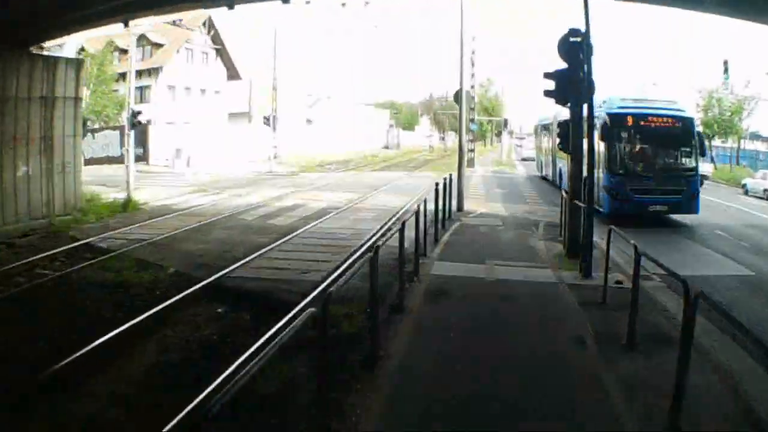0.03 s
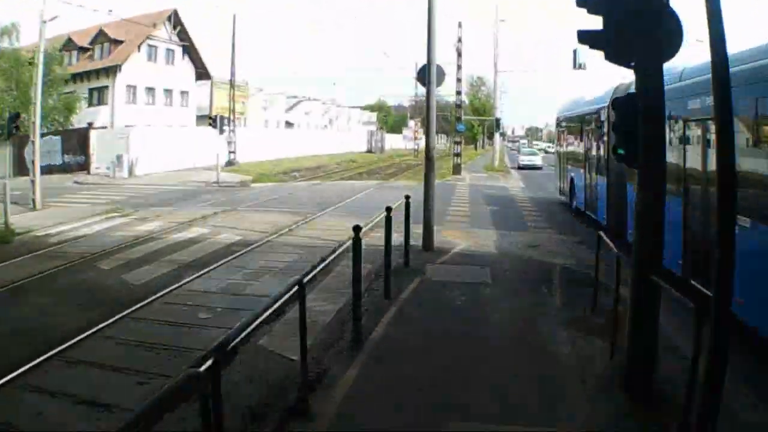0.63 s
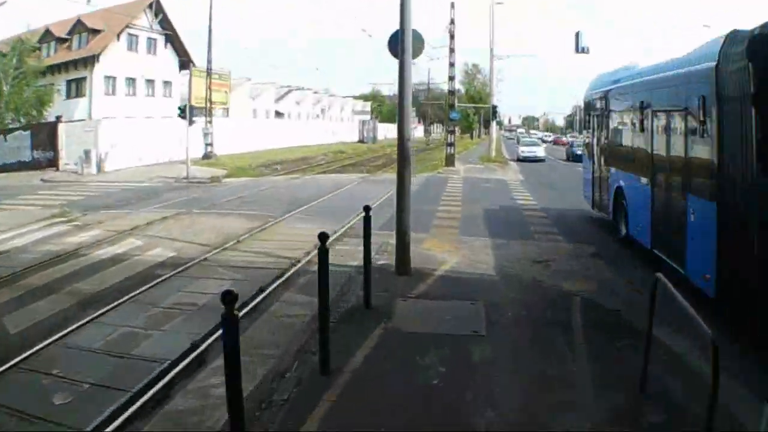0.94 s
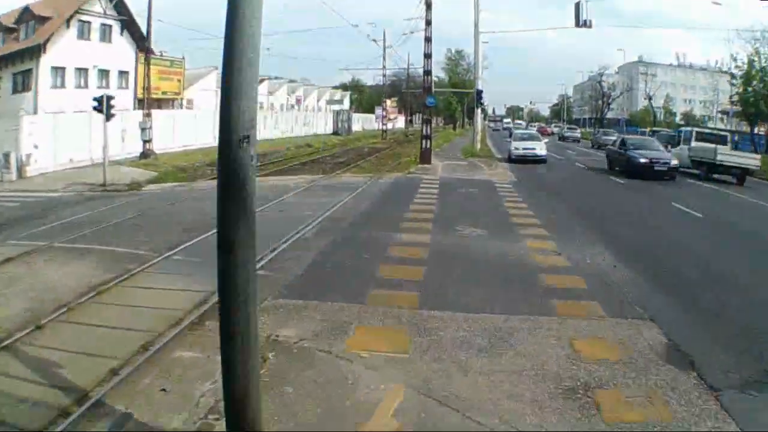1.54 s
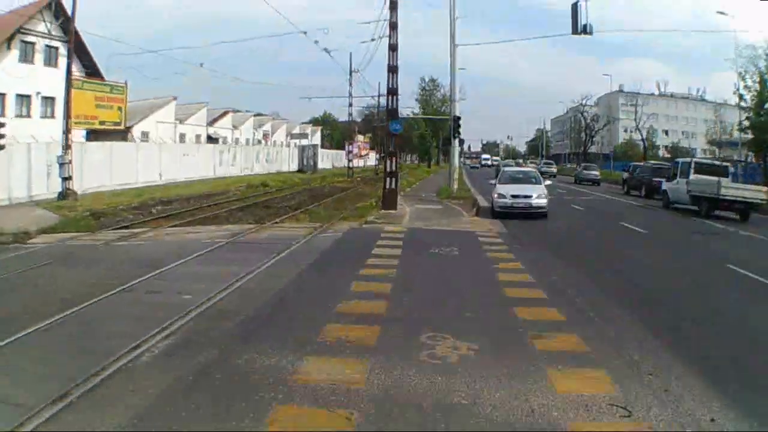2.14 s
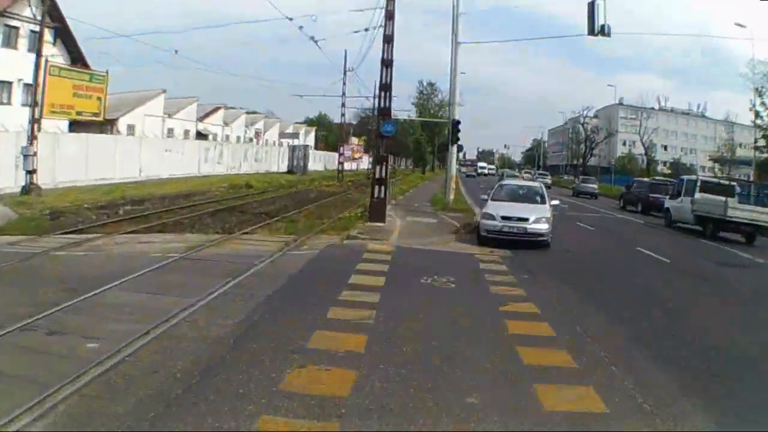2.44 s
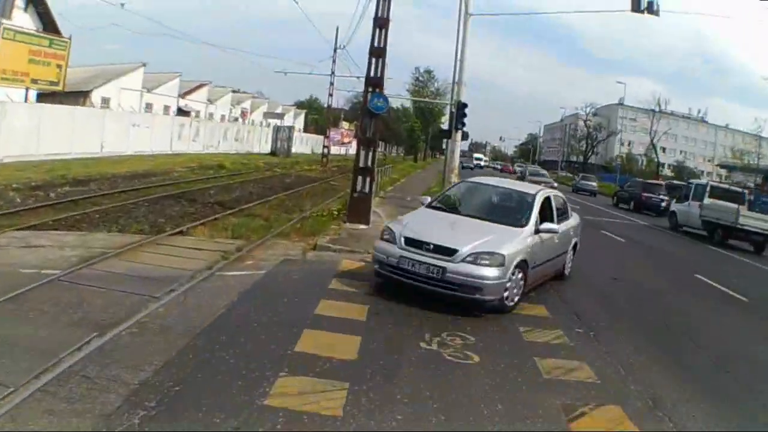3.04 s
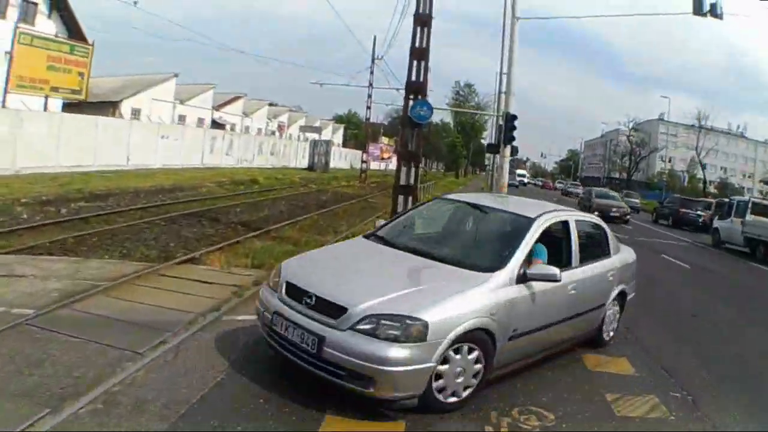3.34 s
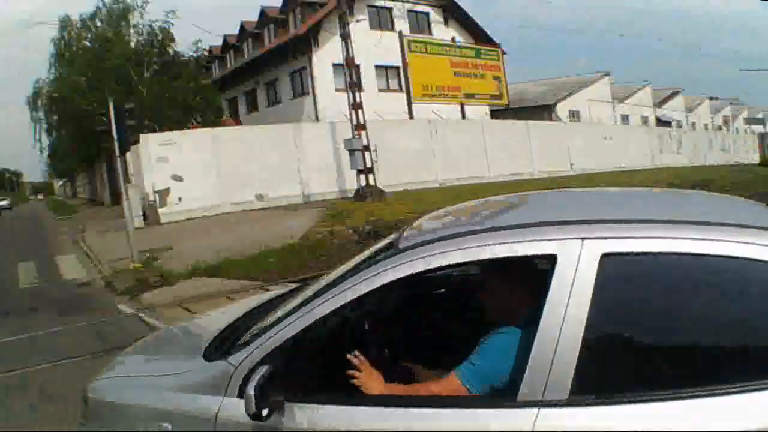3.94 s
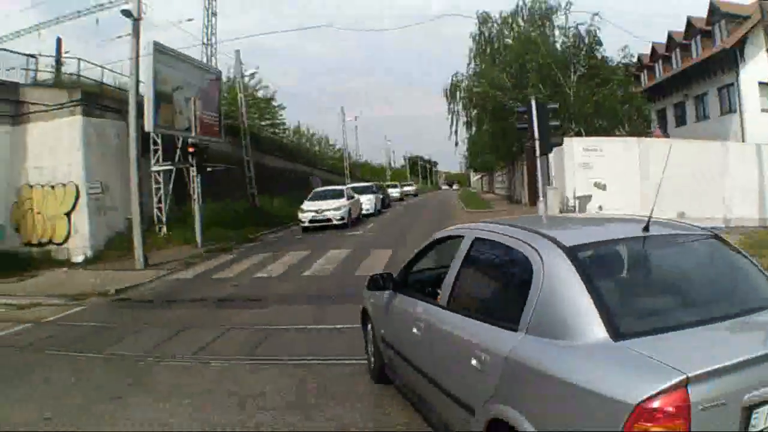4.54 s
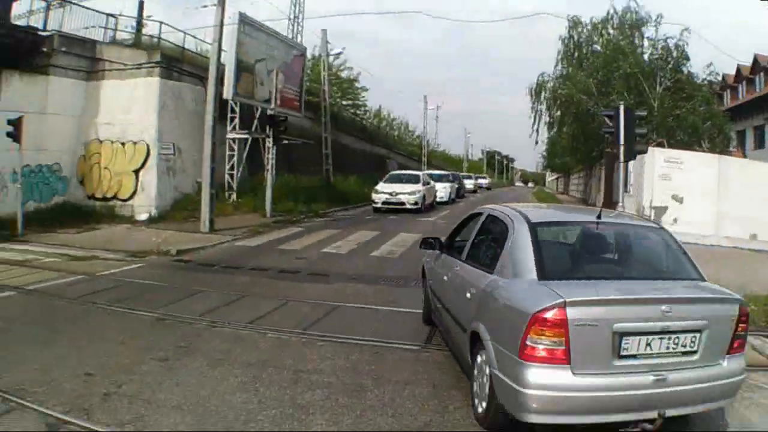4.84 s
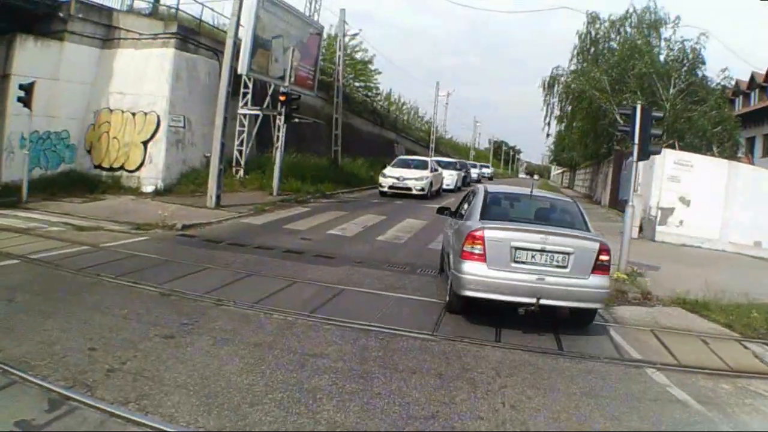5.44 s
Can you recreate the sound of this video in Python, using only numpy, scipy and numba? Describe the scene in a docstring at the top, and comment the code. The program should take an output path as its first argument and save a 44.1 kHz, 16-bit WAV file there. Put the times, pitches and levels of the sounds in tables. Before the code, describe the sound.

A bicycle air horn blasts one long, distorted note over street noise, with a brief brake squeak, before a car pulls away.

```python
"""An air horn on a bicycle blasts one long 800 Hz note, so close that the camera turns its gain down and
still overloads. The buzzing diaphragm beats against its own reflections and echoes off the house fronts.
Under it a brake block squeaks on the rim as a car cuts across the bike path. The car pulls away,
its exhaust booming with the rising revs, and the bicycle rattles and ticks faintly.
Tyre noise from the city street and a deep rumble from the overloaded microphone lie beneath it all."""
import sys
import numpy as np
from scipy import signal
from scipy.fft import rfft, irfft
from scipy.io import wavfile
from scipy.ndimage import uniform_filter1d
from numba import njit

SR = 44100
rng = np.random.default_rng(int(sys.argv[2]) if len(sys.argv) > 2 else 0)


def materialize(psi):
    """Save the field psi as 16-bit PCM at rate SR to the path in sys.argv[1].

    A 1-D psi becomes a single channel; in a 2-D psi each row is a channel.
    """
    bounded = np.clip(np.atleast_2d(psi).T, -1, 1)
    quanta = np.round(bounded * 32767).astype(np.int16)
    wavfile.write(sys.argv[1], SR, quanta)


N = 251370
TIME = np.arange(N) / SR
CAR_CLOSEST_S = 3.884

# The bicycle brakes for the car. Each row: time in seconds, speed in m/s.
BIKE_SPEED = [(3.4, 4.2), (4.2, 1.371)]


def horn(on_s=2.5115, off_s=4.372, attack_s=0.0027, release_s=0.006, pitch_hz=797.5, flare_rad=-0.15):
    """A buzzing diaphragm, coloured by a close reflection and beating against Doppler-shifted far ones."""
    # The body of the note. Each row: multiple of the pitch, relative level in dB.
    main_partials = [(1, 1), (2, 2), (3, -6.5), (4, -9), (5, -18)]
    # As the close reflection's lag shifts, different partials cancel.
    # Each row: time in seconds, lag in ms, relative level of the note in dB.
    close_path = [(2.53, 0.86, -10.5), (2.78, 0.87, -10.9), (2.9, 0.9, -9), (2.99, 0.89, -10),
                  (3.15, 0.96, -9), (3.3, 0.97, -10.5), (3.5, 1.063, -11.5), (3.72, 0.95, -10),
                  (3.88, 0.84, -10.5), (4.02, 0.83, -11), (4.21, 0.58, -8.5), (4.36, 0.69, -13)]
    # What the car throws back. Each row: relative strength, relative Doppler shift.
    reflections = [(0.58, -1.0), (1, .9), (0.79, -0.23)]
    # The rasp around the note. Each row: frequency in Hz, relative density in dB.
    rasp_colour = [(1000, -2.5), (4000, -1.5), (9000, -8), (15000, -9)]
    age = (TIME - on_s).clip(0)
    pitch = pitch_hz + 30 * np.exp(-age / .005) + 3.3 * age   # starts sharp, settles, creeps up
    phase = 2 * np.pi * np.cumsum(pitch + 1.7 * drift(rate=1000)) / SR
    lag_ms, level_db = in_time(close_path)
    paths = [(1, phase), (0.5, phase - 2 * np.pi * pitch * lag_ms / 1000)]
    speed, = in_time(BIKE_SPEED)
    doppler_hz = 2 * pitch * speed / 343   # sound travels at 343 m/s
    car_near = nearness(CAR_CLOSEST_S, half_s=0.25)
    for strength, shift in reflections:
        beat_hz = doppler_hz * (shift + .3 * drift(rate=10))
        slip = 2 * np.pi * (np.cumsum(beat_hz) / SR + rng.random())
        paths.append((0.24 * strength * car_near, phase + slip))
    thin_buzz = [(k, -30 - (k - 7)) for k in range(7, 20)]   # each partial 1 dB below the last
    # the flare shifts the higher partials against the fundamental
    note = sum(from_db(db) * gain * np.cos(k * path_phase + flare_rad * (k - 1) ** 2)
               for k, db in main_partials + thin_buzz for gain, path_phase in paths)
    shiver_db = 1.5 * car_near * drift(rate=31)
    rasp = from_db(-38 - 3.5 * age) * noise(rasp_colour)
    pressed = fade_in(on_s, attack_s) * (1 - fade_in(off_s, release_s))
    return pressed * (from_db(level_db + shiver_db) * note + rasp)


def street_echo(x, first_echo_s=0.0218, t60_s=0.47, midrange_db=-18.5):
    """House fronts return a diffuse, dying echo."""
    # The tone of the echo. Each row: frequency in Hz, relative density in dB.
    echo_colour = [(500, -9), (800, 4.5), (1600, 0.5), (2400, 4.5), (3200, -14), (4000, 2), (5600, -11),
                   (8000, -39)]
    tail = noise(echo_colour) * from_db(-60 * TIME / t60_s) * (TIME > first_echo_s)
    tail /= np.abs(rfft(tail))[int(700 * N / SR):int(1700 * N / SR)].mean()   # unit gain, 700-1700 Hz
    return from_db(midrange_db) * signal.fftconvolve(x, tail[:SR])[:N]


def brake(rise_s=0.0042, t60_s=0.22, judder_db=4.0):
    """A block grabs the rim, singing and rubbing; each grab swells quickly and dies away, juddering."""
    # The block bites. Each row: peak time in seconds, squeal level in dB, rubbing level in dB.
    grabs = [(3.246, -17, -16.5), (3.268, -15, -13), (3.303, -19, -14)]
    # A narrow squeal and a broad rub. Each row: frequency in Hz, relative density in dB.
    squeal_colour = [(1700, -11), (2020, 3), (2120, 2), (2220, -12), (2600, -42)]
    rubbing_colour = [(200, -14), (900, -5.5), (1500, -3), (2100, -5), (2800, -4), (4500, -12), (9000, -38)]
    squeal, rubbing, out = noise(squeal_colour), noise(rubbing_colour), 0
    for peak_s, squeal_db, rubbing_db in grabs:
        age = TIME - peak_s
        grip = np.exp(age.clip(None, 0) / rise_s) * from_db(-60 * age.clip(0) / t60_s)
        out = out + grip * (from_db(squeal_db) * squeal + from_db(rubbing_db) * rubbing)
    return out * from_db(judder_db * drift(rate=460))


def engine(gain_db=-47, earshot_s=2.9):
    """Low exhaust orders follow the revs and boom as they climb through resonances."""
    # The car rolls up, drops its revs and pulls away. Each row: time in seconds, crank turns a second.
    revs = [(3.7, 43), (4.5, 45.3), (4.72, 42.3), (4.88, 43), (5.7, 52.7)]
    # The exhaust note. Each row: multiple of the crank rate, relative level in dB.
    orders = [(2, -5), (3, 0), (4, -8), (5, -11), (6, -14), (8, -16)]
    # Exhaust resonances. Each row: centre in Hz, half width in Hz, boost in dB.
    booms = [(85, 4, 12), (143, 6.5, 13), (264.4, 10, 17)]
    crank_hz, = in_time(revs)
    crank_phase = 2 * np.pi * np.cumsum(crank_hz) / SR
    out = 0
    for k, db in orders:
        boom_db = sum(boost / (1 + ((k * crank_hz - hz) / width) ** 2) for hz, width, boost in booms)
        level = from_db(db + boom_db - drift(rate=7.3))   # wavers by about 1 dB
        out = out + level * np.sin(k * crank_phase + rng.uniform(0, 2 * np.pi))
    return from_db(gain_db) * fade_in(earshot_s, swell_s=.3) * out


def rattles(coast_from_s=5.071, coast_to_s=5.53, pawl_gap_s=.04, rise_s=0.0011, t60_s=0.075):
    """Each rattle, and each tick of the freewheel's pawl, is a short, dull metallic chink."""
    # Small rattles of the bicycle. Each row: start in seconds, level in dB.
    chinks = [(1.163, -56), (4.443, -48), (4.655, -51), (4.670, -51), (4.805, -52)]
    # The tone of the metal. Each row: frequency in Hz, relative density in dB.
    metal_colour = [(1500, -29.5), (3000, 13), (4200, 13), (5200, -1.5), (7200, -7), (9000, -62)]
    pawl_ticks = []
    for s in np.arange(coast_from_s, coast_to_s, pawl_gap_s):
        start_s = s + 0.0022 * rng.standard_normal()
        db = -53.5 - 5 * (s - coast_from_s) + 2 * rng.standard_normal()   # fading and uneven
        pawl_ticks.append((start_s, db))
    envelope = np.zeros(N)
    for start_s, db in chinks + pawl_ticks:
        start = int(start_s * SR)
        age = TIME[:min(SR // 10, N - start)]
        envelope[start:start + len(age)] += from_db(db - 60 * age / t60_s) * (1 - np.exp(-age / rise_s))
    return envelope * noise(metal_colour)


def traffic(rumble_db=-32.5, roar_db=-33.5, hiss_db=-62.5, db_per_m_per_s=1.66):
    """Tyres rumble, roar and hiss, sinking as the bicycle slows and swelling as vehicles go by."""
    # A bus, two cars, the turning car's rear wheels, the same car leaving.
    # Each row: closest moment and half length in seconds, then rumble, roar and hiss levels in dB.
    passes = [(1.3, 0.43, -47, -62, -60), (1.87, 0.1, -34.5, -36, -58), (2.476, 0.044, -32, -37, -78),
              (4.416, 0.079, -40, -30.5, -56), (5.3, 0.33, -53, -38, -62)]
    # The three bands of tyre noise. Each row: frequency in Hz, relative density in dB.
    rumble_colour = [(20, -14), (45, 0), (100, 0), (180, 1.5), (350, 1.5), (550, -0.5), (750, -3.5),
                     (1200, -70)]
    roar_colour = [(350, -32.5), (620, -13.5), (800, -1), (1100, -1), (1550, -4), (1900, -11),
                   (2350, -14.5), (2700, -36), (3500, -91.5)]
    hiss_colour = [(1800, -9.5), (2700, 11), (3400, 15), (4200, 9), (5000, -6), (6300, -11.5),
                   (8000, -34.5), (12000, -34.5), (15500, -30.5)]
    speed, = in_time(BIKE_SPEED)
    slowing_db = db_per_m_per_s * (speed - speed[0])
    power = np.outer(from_db([rumble_db, roar_db, hiss_db]), from_db(slowing_db)) ** 2
    for closest_s, half_s, *bands_db in passes:
        power += np.outer(from_db(bands_db), nearness(closest_s, half_s)) ** 2
    rumble, roar, hiss = np.sqrt(power)
    low = rumble * noise(rumble_colour) * from_db(drift(rate=22))
    high = (roar * noise(roar_colour) + hiss * noise(hiss_colour)) * from_db(drift(rate=26))
    return low + high


def overload_rumble(base_db=-56, flutter_peak_db=-30.5, unevenness_db=6.0):
    """A deep, uneven rumble from the overloaded microphone, strongest while the horn flutters."""
    # The tone of the rumble. Each row: frequency in Hz, relative density in dB.
    rumble_colour = [(10, -4.5), (28, 3.5), (50, -3), (90, -27.5), (200, -27.5)]
    level = from_db(base_db) + from_db(flutter_peak_db) * nearness(CAR_CLOSEST_S, half_s=0.47) ** 4
    return level * from_db(unevenness_db * drift(rate=19)) * noise(rumble_colour)


def from_db(db):
    """Decibels to gain."""
    return 10 ** (np.asarray(db) / 20)


def rms_one(x):
    """Scale to unit power."""
    return x / np.sqrt(np.mean(x ** 2) + 1e-20)


def in_time(rows):
    """Each column of a curve table, sample by sample."""
    times, *columns = np.transpose(rows)
    return [np.interp(TIME, times, column) for column in columns]


def fade_in(middle_s, swell_s):
    """A smooth rise from 0 to 1, halfway up at middle_s."""
    return .5 * (1 + np.tanh((TIME - middle_s) / swell_s))


def nearness(closest_s, half_s):
    """Something goes by in a straight line: 1 when closest, falling as one over distance."""
    return 1 / np.hypot(1, (TIME - closest_s) / half_s)


def noise(colour):
    """Unit-power noise with the given spectrum, falling 30 dB an octave above its last point."""
    hz, db = np.transpose(colour)
    bins = np.fft.rfftfreq(N, 1 / SR).clip(1)
    shape_db = np.interp(np.log(bins), np.log(hz), db) - 30 * np.log2(bins / hz[-1]).clip(0)
    return rms_one(irfft(rfft(rng.standard_normal(N)) * from_db(shape_db), N))


def drift(rate):
    """A random wander with spread 1, up to about `rate` swings a second."""
    bins = np.fft.rfftfreq(N, 1 / SR)
    return rms_one(irfft(rfft(rng.standard_normal(N)) / (1 + (bins / rate) ** 2) ** 2, N))


def gain_control(x, threshold_db=-20, range_db=9.0, attack_s=0.0065, recovery_db_per_s=31):
    """A loud sound pulls the gain down quickly; afterwards it climbs back at a steady rate."""
    power = uniform_filter1d(x ** 2, size=SR // 200).clip(1e-12)
    cut_db = np.clip(10 * np.log10(power) - threshold_db, 0, range_db)
    climb_db = recovery_db_per_s * TIME
    held_db = np.maximum.accumulate(cut_db + climb_db) - climb_db
    pole = np.exp(-1 / (attack_s * SR))
    return x * from_db(-signal.lfilter([1 - pole], [1, -pole], held_db))


@njit
def clip_and_centre(x, ceiling, settle_samples):
    """A hard ceiling, with a coupling capacitor that slowly pulls the output's mean back to zero."""
    out, offset = np.empty_like(x), 0.0
    for i in range(len(x)):
        out[i] = min(x[i] - offset, ceiling)
        offset += out[i] / settle_samples
    return out


def scene():
    """Everything meets at one microphone on the bicycle."""
    blast = from_db(9.0) * horn()
    mix = blast + street_echo(blast) + traffic() + overload_rumble() + brake() + engine() + rattles()
    return mix[None]


def record(dry, floor=0.31, ceiling=.5, settle_s=.02, self_noise_db=-78, cutoff_hz=15650):
    """The microphone gives softly on the downswing and clips hard on the upswing: the horn turns brassy."""
    # The camera's gentle treble contour. Each row: frequency in Hz, gain in dB.
    presence = [(800, 0.21), (1600, -0.5), (2400, -0.5), (4000, 0), (6400, 0.8), (8000, -0.5), (11000, 1),
                (15000, -4)]
    fine_sr = 2 * SR
    fine = signal.resample_poly(gain_control(dry[0]), 2, 1)
    fine = np.where(fine < 0, floor * np.tanh(fine / floor), fine)
    # a loud sound drags the bias down, so the note starts with a thump
    smoothing = signal.butter(2, 70, fs=fine_sr, output="sos")
    sag = 2 * signal.sosfilt(smoothing, np.minimum(fine, ceiling) ** 2)
    clipped = signal.resample_poly(clip_and_centre(fine - sag, ceiling, fine_sr * settle_s), 1, 2)
    noisy = clipped + from_db(self_noise_db) * rng.standard_normal(N)
    hz, db = np.transpose(presence)
    toned = irfft(rfft(noisy) * from_db(np.interp(np.fft.rfftfreq(N, 1 / SR), hz, db)), N)
    return signal.fftconvolve(toned, signal.firwin(601, cutoff_hz, fs=SR), "same")[None]


dry = scene()
out = record(dry)
materialize(out)
```